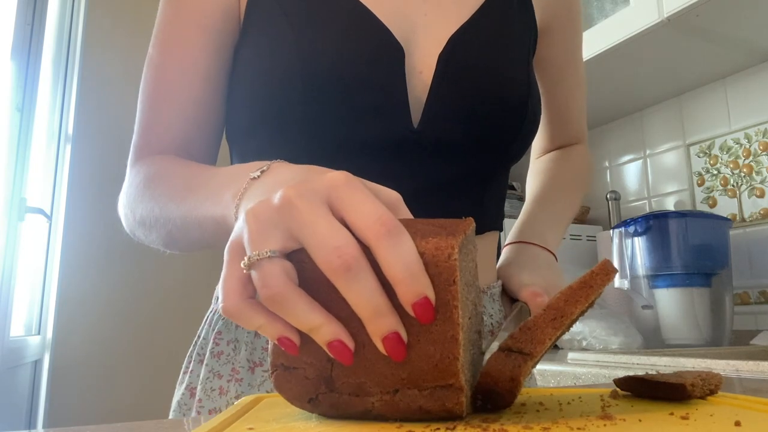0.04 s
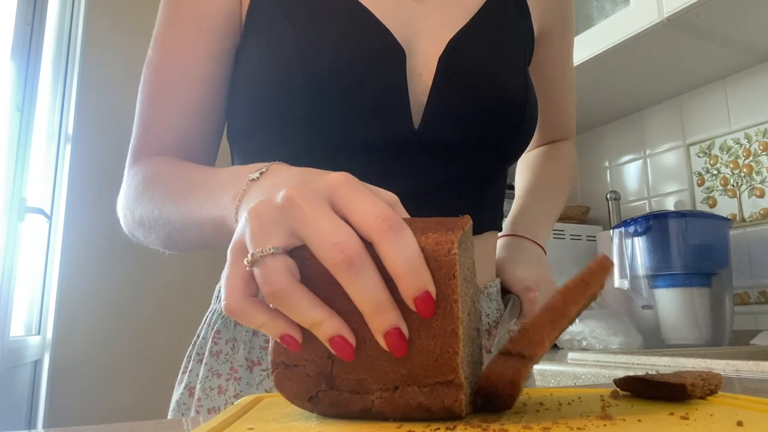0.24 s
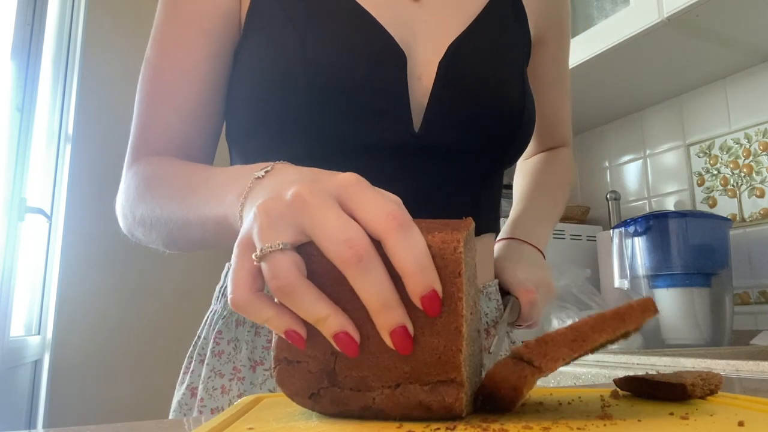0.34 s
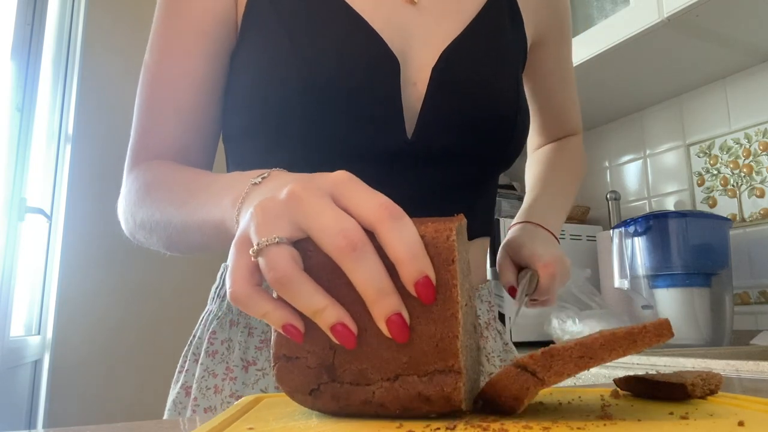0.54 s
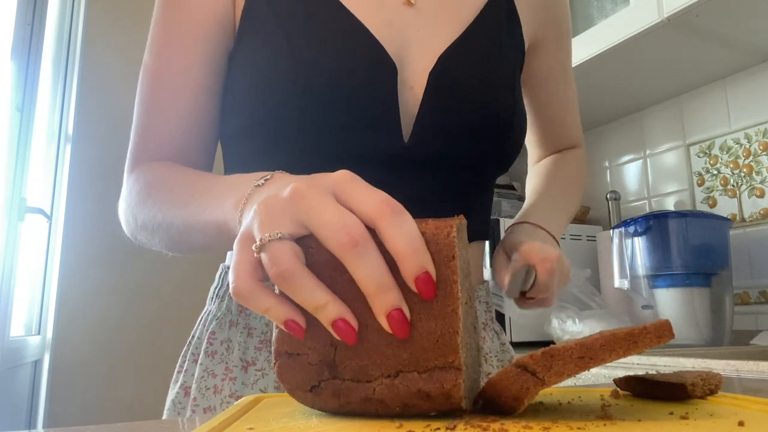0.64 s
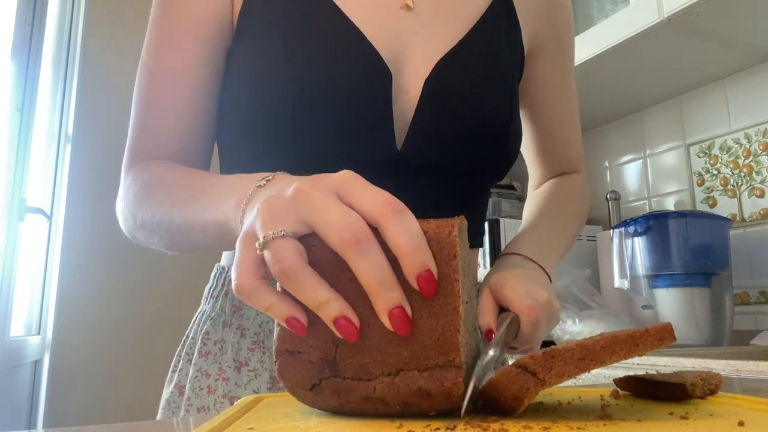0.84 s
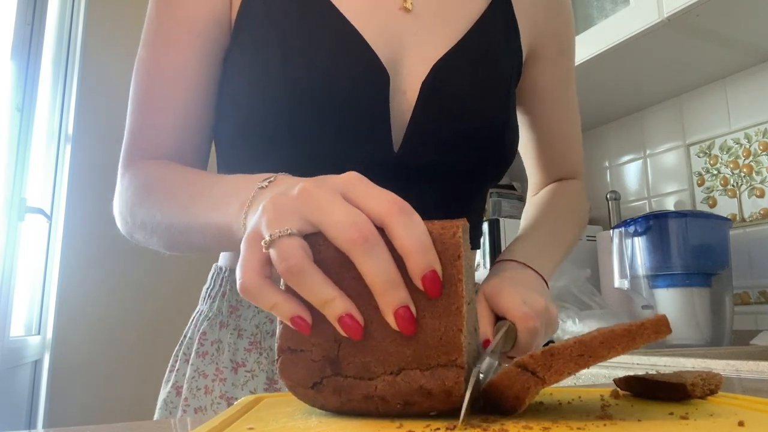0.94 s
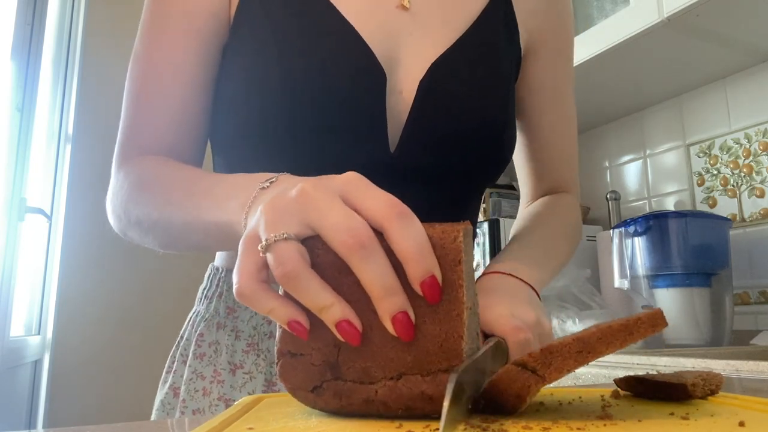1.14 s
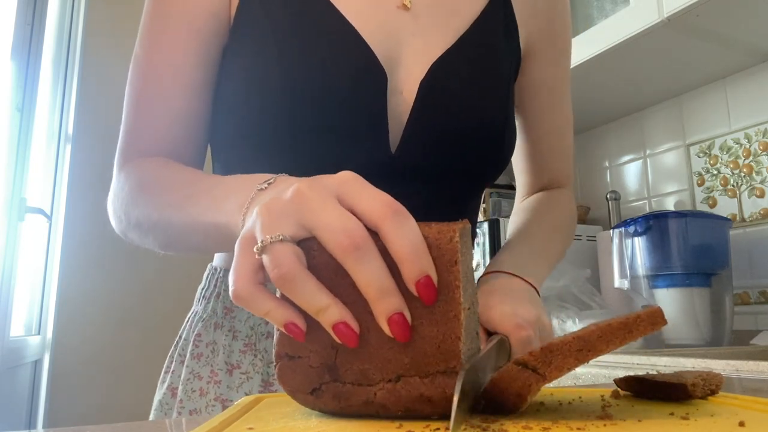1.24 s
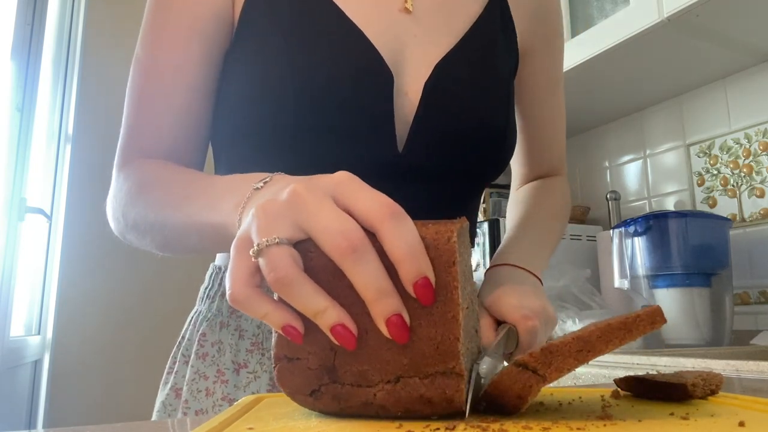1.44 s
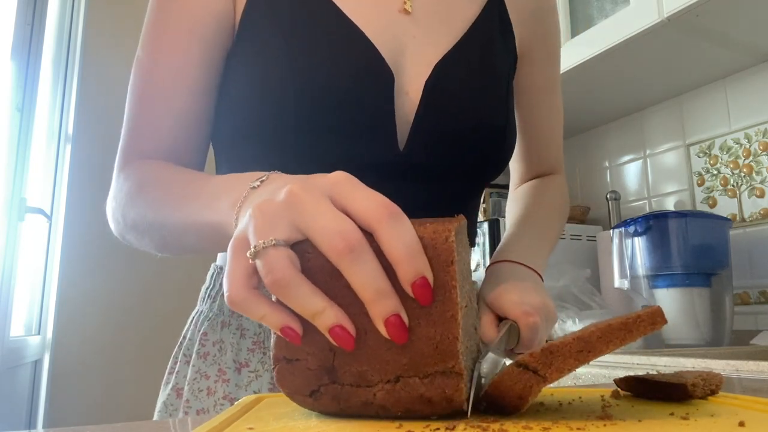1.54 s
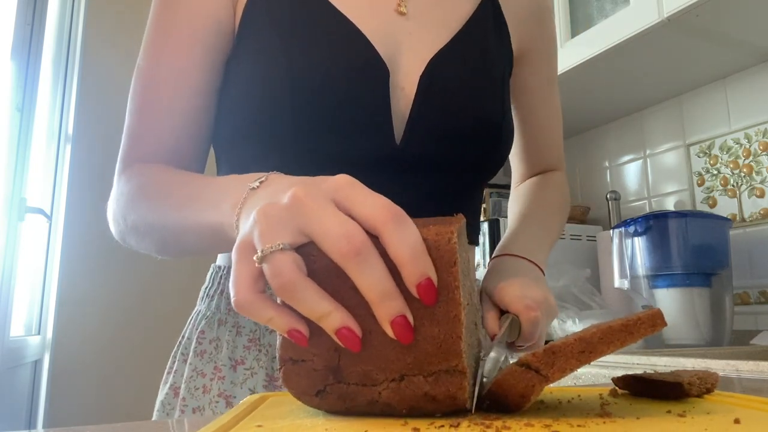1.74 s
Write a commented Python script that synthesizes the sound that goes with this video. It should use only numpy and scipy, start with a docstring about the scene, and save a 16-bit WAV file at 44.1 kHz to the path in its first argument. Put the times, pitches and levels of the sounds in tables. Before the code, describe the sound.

A knife finishes slicing crusty bread: small snaps, a loud crunching crack and wooden thud, a lull with faint crumb ticks, then softer scraping strokes, board knocks and crisp crackles. Close microphones, short room tail, low appliance hum.

```python
"""Kitchen with a steady hum: close up, a bread knife finishes a slice of a crusty loaf on a cutting board.
The last crust cracks and the blade thumps the board; then it saws on along the bottom crust, knocks
the board and snaps off more flakes. Snaps and cracks are filtered noise bursts, board and loaf are dying
sines, sawing is dense random clicks through filters and resonances. A short room tail surrounds the knife."""
import sys
import numpy as np
from scipy import signal
from scipy.fft import rfft, irfft
from scipy.io import wavfile

SR = 44100
rng = np.random.default_rng(int(sys.argv[2]) if len(sys.argv) > 2 else 0)


def int16_out(signal):
    """Quantize to a 16-bit WAV file."""
    q = np.round(np.clip(np.atleast_2d(signal).T, -1, 1) * 32767)
    wavfile.write(sys.argv[1], SR, q.astype(np.int16))


N = 79380

# spectrum of hard crust breaking: f/Hz, level/dB
CRUST_COLOUR = [(100, -51), (330, -6.5), (900, -8.5), (1330, -1.5), (1900, 1), (2600, -7), (3100, -15),
                (8200, -15.5), (16000, -43.5)]
# spectrum of steel teeth rasping: f/Hz, level/dB
RASP_COLOUR = [(300, -32), (2000, 0.5), (5400, -3.5), (7000, 1.5), (7900, 4.5), (9600, -4), (10600, -19.5),
               (12500, -8.5), (16000, -53)]
GRAIN_SPREAD_DB = 4  # mean excess of a click over the smallest, before capping


def amp(db):
    """Decibels to gain."""
    return 10 ** (np.asarray(db) / 20)


def evened(x):
    """Scales to rms 1."""
    return x / np.sqrt(np.mean(x ** 2) + 1e-20)


def read(points, hz):
    """Reads a table on a log-frequency axis."""
    f, value = np.transpose(points)
    return np.interp(np.log(hz + 1), np.log(f + 1), value)


def add(mix, s, sound):
    """Mixes a sound in at a time in seconds."""
    part = mix[max(round(s * SR), 0):][:len(sound)]
    part += sound[:len(part)]


def colour(x, points, size=4096):
    """Filters through a causal, minimum-phase response of unit energy with the given spectrum."""
    hz = abs(np.fft.fftfreq(size, 1 / SR))
    log_gain = np.log(amp(read(points, hz)))
    minimum_phase = np.exp(np.conj(signal.hilbert(log_gain)))
    taps = np.fft.ifft(minimum_phase).real[:size // 2]
    return signal.fftconvolve(x, taps / np.linalg.norm(taps))[:N]


def resonate(x, hz, width_hz):
    """A steep resonance that can follow a curve of pitches; output at rms 1."""
    turn = np.exp(2j * np.pi * np.cumsum(hz * np.ones(N)) / SR)
    r = np.exp(-np.pi * width_hz / SR)
    # shift the pitch down to zero, low-pass with a double pole, shift back up
    slow = signal.lfilter([1], [1, -2 * r, r * r], x / turn)
    return evened((turn * slow).real)


def ring(modes, rise_s):
    """Dying sines of a struck object, swelling in over the rise time."""
    t = np.arange(SR // 2) / SR
    sines = sum(amp(db - 60 * t / t60) * np.sin(2 * np.pi * hz * t) for hz, db, t60 in modes)
    return (1 - np.exp(-t / rise_s)) * sines


def fracture(fade_s, first=0):
    """A first break and a dying spray of smaller ones, energy 1."""
    t = np.arange(SR // 20) / SR
    spray = rng.standard_normal(len(t)) * np.exp(-t / fade_s)
    spray[0] = first
    return spray / np.linalg.norm(spray)


def grains(per_s, spread_db):
    """Random clicks of uneven size and either sign."""
    hits = rng.random(N) < per_s / SR
    sizes = amp(spread_db * np.minimum(rng.exponential(1, N), 4))
    return hits * rng.choice([-1, 1], N) * sizes


def background():
    """A wavering two-tone appliance hum, in both channels alike, over wide low-pitched noise."""
    # appliance hum: f/Hz, level/dB rms before the waver
    hum_tones = [(62, -47.5), (121.5, -29.5)]
    # room noise spectrum: f/Hz, level/dB
    floor_colour = [(20, -15.5), (110, -3.5), (190, -7), (270, -14), (600, -22), (3600, -51), (8000, -50),
                    (16000, -91.5)]
    hum_waver, floor_db, floor_width = .04, -40, 0.44  # rms share of level, dB rms of mid, side gain
    t = np.arange(N) / SR
    waver = 1 + hum_waver * resonate(rng.standard_normal(N), 15, 6.9)
    tones = sum(amp(db) * np.sqrt(2) * np.sin(2 * np.pi * hz * t) for hz, db in hum_tones)
    mid, side = (evened(colour(rng.standard_normal(N), floor_colour)) for _ in range(2))
    floor = np.array([mid + floor_width * side, mid - floor_width * side])
    return waver * tones + amp(floor_db) * floor


def sawing():
    """Teeth catch and slip in the crust: rasp, duller scrape, judder of blade and board, rising zips."""
    # sawing stroke: t/s, then relative levels of tooth rasp/dB, loaf scrape/dB, blade judder/dB
    stroke = [(0, -45.5, -37.5, -59), (0.101, -54, -76, -49), (0.189, -42, -35.5, -48),
              (0.228, -29, -35, -22.5), (0.264, -20, -15.5, -38), (0.321, -57, -33.5, -79),
              (0.471, -51, -52.5, -51.5), (0.852, -60.5, -64.5, -56), (0.886, -48, -50, -41),
              (0.96, -55.5, -39.5, -53), (1.028, -33, -38, -42), (1.085, -36.5, -29.5, -28),
              (1.21, -50, -47, -49), (1.249, -33.5, -32.5, -31.5), (1.339, -35.5, -31.5, -34),
              (1.409, -37.5, -35, -28.5), (1.511, -41, -42, -38), (1.573, -65, -54, -48),
              (1.645, -47, -43.5, -39.5), (1.726, -47, -41.5, -49), (1.769, -56, -54.5, -53)]
    # pushes, resonance climbing as the blade speeds up: start t/s, length/s, peak level/dB, from f/Hz, to f/Hz
    pushes = [(1, 0.115, -31, 750, 1530), (1.242, 0.05, -33.5, 1360, 1520)]
    # spectrum of the scrape in the loaf: f/Hz, level/dB
    scrape_colour = [(70, -52), (290, 6.5), (480, 3), (1000, 1), (1420, 2), (2300, -3), (3200, -9.5),
                     (16000, -50)]
    teeth_per_s = 2200
    catch_hz, catch_db = 35, 2.5  # uneven grip: centre and width, rms swing
    judder_hz, judder_width_hz, judder_db = 766, 150, -4
    rumble_hz, rumble_width_hz, rumble_db = 188.4, 75, 0  # the table, along with the judder
    push_width_hz = 340

    t = np.arange(N) / SR
    times, *levels = np.transpose(stroke)
    rasp, scrape, judder = (amp(np.interp(t, times, db)) for db in levels)
    grip = amp(catch_db * resonate(rng.standard_normal(N), catch_hz, catch_hz))
    teeth, drag = (evened(grip * grains(teeth_per_s, GRAIN_SPREAD_DB)) for _ in range(2))

    body = amp(judder_db) * resonate(drag, judder_hz, judder_width_hz)
    body += amp(rumble_db) * resonate(drag, rumble_hz, rumble_width_hz)
    out = colour(teeth * rasp, RASP_COLOUR) + colour(drag * scrape, scrape_colour) + judder * body
    for s, length, db, from_hz, to_hz in pushes:
        progress = np.clip((t - s) / length, 0, 1)
        pitch = from_hz + (to_hz - from_hz) * progress
        out += amp(db) * np.sin(np.pi * progress) * resonate(teeth, pitch, push_width_hz)
    return out


def crust():
    """Noise-burst snaps of flakes, stray crumb ticks, cracks that ring the loaf, and a fading crumble."""
    # flakes of crust snapping: t/s, relative level/dB, relative level of the hollow part/dB
    snaps = [(0.0975, -18, -18.5), (0.1714, -28, -19.5), (0.2360, -19, -14), (0.4325, -26, -18),
             (0.5304, -26, -42), (0.5434, -21, -31), (0.63, -31, -31.5), (0.9280, -16.5, -28),
             (1.0046, -21, -32), (1.1407, -12.5, -7.5), (1.1937, -23, -37), (1.2500, -25, -30),
             (1.3157, -8.5, -3.5), (1.3810, -24, -19), (1.538, -17, -33), (1.641, -25, -45),
             (1.7263, -38, -26), (1.7910, -20, -29.5)]
    # crust breaking through: t/s, relative level/dB, fade to 1/e/s
    cracks = [(0.2065, -7, 0.001), (0.2087, -4, 0.0015), (0.2221, -11, 0.0017), (0.2438, -4.5, 0.008),
              (0.2544, 7.5, 0.0016), (0.257, -4, 0.0044)]
    # modes of the hard crust before their random shift: f/Hz, level/dB, t60/s
    loaf_modes = [(1320, -8, 0.024), (1790, -8.5, 0.026), (1931, -13, 0.03)]
    # spectra of the bright and hollow parts of a snap: f/Hz, level/dB
    snap_colour = [(300, -60), (1500, -8), (3000, -13.5), (4200, -0.5), (6700, -2), (7900, 13), (9500, 2.5),
                   (10600, -17.5), (12500, -4), (16000, -34)]
    hollow_colour = [(250, -26), (600, -10.5), (1150, 0), (1400, 2), (1700, -2), (6000, -9.5),
                     (16000, -27.5)]
    snap_fade_s, snap_first = .0011, 3.06
    snap_db, hollow_gain_db, crack_db = 16.5, 13.5, 13  # gains on the relative levels
    crumbs_per_s, crumb_db, crumb_spread_db = 12, -61.5, 7  # crumb level precedes the snap gain
    crumble_start_s, crumble_db, crumble_db_per_s, crumble_per_s = 0.27, -30, 106.5, 1100
    loaf_spread = .02  # standard deviation of the pitch shift at each crack, as a ratio

    bright = amp(crumb_db) * grains(crumbs_per_s, crumb_spread_db)
    hollow, loaf = np.zeros((2, N))
    for s, db, hollow_db in snaps:
        add(bright, s, amp(db) * fracture(snap_fade_s, snap_first))
        add(hollow, s, amp(hollow_db + hollow_gain_db) * fracture(snap_fade_s, snap_first))

    age = np.arange(N) / SR - crumble_start_s
    crumble_level = (age > 0) * amp(crumble_db - crumble_db_per_s * abs(age))
    broken = crumble_level * evened(grains(crumble_per_s, GRAIN_SPREAD_DB))
    for s, db, fade_s in cracks:
        add(broken, s, amp(db + crack_db) * fracture(fade_s))
        shifted = [(hz * (1 + loaf_spread * rng.standard_normal()), level, t60)
                   for hz, level, t60 in loaf_modes]
        add(loaf, s, amp(db) * ring(shifted, rise_s=0.00013))

    flakes = amp(snap_db) * colour(bright, snap_colour) + colour(hollow, hollow_colour)
    return flakes + colour(broken, CRUST_COLOUR) + loaf


def knocks():
    """Struck modes: the board clacks, the table thumps just after, the touched steel scuffs and rings."""
    # blade on the board: t/s, then relative levels of thump/dB, clack/dB, crunch/dB
    hits = [(0.255, -2, -14, -15), (0.9680, -22.5, -29, -16.5), (1.114, -12, -5.5, 7.5),
            (1.2272, -14.5, -19.5, 0)]
    # modes of board and table, slow thump then clack: f/Hz, level/dB, t60/s
    thump = [(167, -8.5, 0.3), (183.6, 8.5, 0.082), (200.3, -0.5, 0.32), (297.2, -3, 0.081)]
    clack = [(413, 2.5, 0.042), (759, 8.5, 0.03), (1430, 1, 0.027)]
    # soft low thuds as the loaf settles: t/s, level/dB
    thuds = [(0.278, -24), (1.159, -21)]
    # blade touching the crust: t/s, relative level/dB
    touches = [(0.8680, -31), (0.9660, -29)]
    # modes of the blade: f/Hz, level/dB, t60/s
    blade = [(763, 7, 0.062), (4780, -13, 0.12), (6200, -9, 0.06), (8040, 3, 0.06)]
    thump_delay_s, thump_rise_s = 0.00288, 0.0065
    thud_hz, thud_t60_s = 80, 0.16
    scuff_db = 16  # gain over the touch level

    out, crunch, scuff = np.zeros((3, N))
    for s, thump_db, clack_db, crunch_db in hits:
        add(out, s + thump_delay_s, amp(thump_db) * ring(thump, thump_rise_s))
        add(out, s, amp(clack_db) * ring(clack, rise_s=0.0022))
        add(crunch, s, amp(crunch_db) * fracture(fade_s=0.005, first=2.6))
    for s, db in thuds:
        add(out, s, amp(db) * ring([(thud_hz, 0, thud_t60_s)], thump_rise_s))
    for s, db in touches:
        add(out, s, amp(db) * ring(blade, rise_s=0.0043))
        add(scuff, s, amp(db + scuff_db) * fracture(fade_s=0.012))
    return out + colour(crunch, CRUST_COLOUR) + colour(scuff, RASP_COLOUR)


def kitchen(x, lead, common, size=256):
    """One microphone port: direct sound, near surfaces and a noise tail with shared bass; lead turns phase."""
    # decay of the kitchen: f/Hz, t60/s
    room_t60 = [(100, 0.17), (1500, 0.32), (8000, 0.22)]
    # level of the tail: f/Hz, level/dB
    room_db = [(100, -6), (400, -12), (2000, -9), (8000, -9), (15000, -9)]
    # near surfaces: nominal delay/s, gain
    echoes = [(.0021, 0.33), (.0046, 0.28)]
    # phase lead of a port before the lead factor: f/Hz, phase/rad
    port_lead = [(150, 0.1), (1000, 0.92), (2500, 1.6), (13000, 0.9)]
    shared_below_hz = 770  # likeness of the two tails falls to 1/e here

    rise = np.minimum(np.arange(SR // 2) / SR / 0.0073, 1)
    noise = np.array([common, rng.standard_normal(SR // 2)]) * rise
    hz, t, (shared, own) = signal.stft(noise, SR, nperseg=size)
    alike = np.exp(-(hz[:, None] / shared_below_hz) ** 2)
    tail = alike * shared + np.sqrt(1 - alike ** 2) * own

    fade = amp(-60 * t / read(room_t60, hz)[:, None])
    fade = fade / np.sqrt((fade ** 2).sum(1, keepdims=True) * size / 2)  # even energy per band
    level = amp(read(room_db, hz))[:, None]
    response = signal.istft(tail * fade * level, SR, nperseg=size)[1]
    response[0] += 1  # direct sound
    for s, gain in echoes:
        add(response, s * rng.uniform(.93, 1.07), gain * fracture(fade_s=0.00064, first=0.82))

    turn = np.exp(1j * lead * read(port_lead, np.fft.rfftfreq(2 * N, 1 / SR)))
    return irfft(rfft(x, 2 * N) * rfft(response, 2 * N) * turn)[:N]


def scene():
    """Knife, loaf and board lead in phase at the left port; the background joins without the room."""
    hum_and_floor = background()
    near = sawing() + crust() + knocks()
    common = rng.standard_normal(SR // 2)
    left, right = kitchen(near, 0.52, common), kitchen(near, -0.6, common)
    return np.array([left, right]) + hum_and_floor


def record(dry):
    """The recorder clips whatever exceeds full scale, then a low-pass sets the band limit."""
    ceiling, edge_hz = 1.0, 16300
    low_pass = signal.firwin(255, edge_hz, window=("kaiser", 8), fs=SR)
    return signal.oaconvolve(np.clip(dry, -ceiling, ceiling), low_pass[None], "same")


dry = scene()
out = record(dry)
int16_out(out)
```